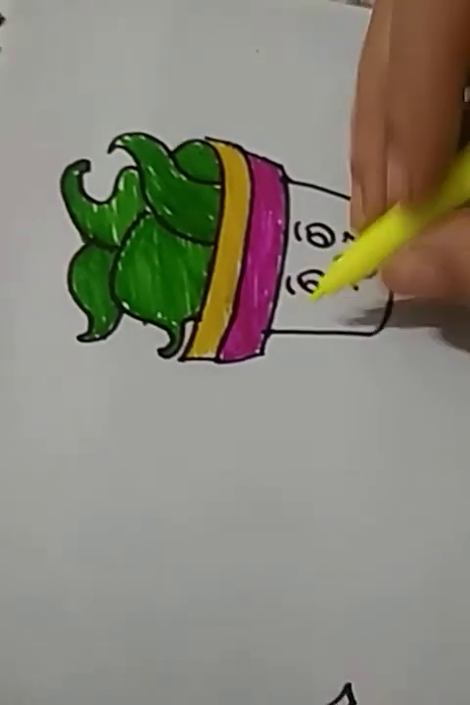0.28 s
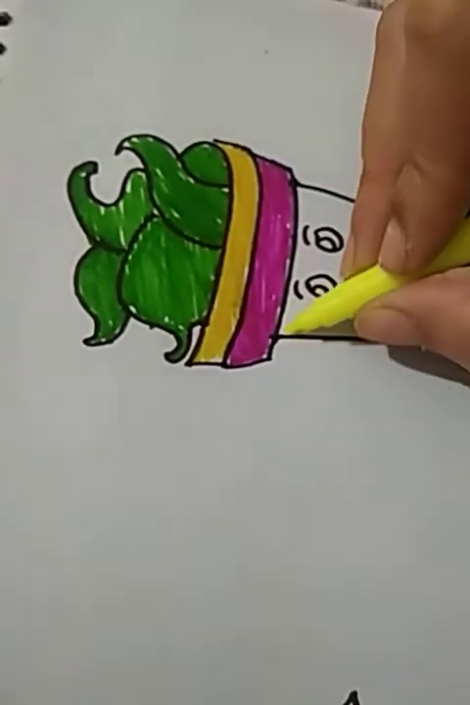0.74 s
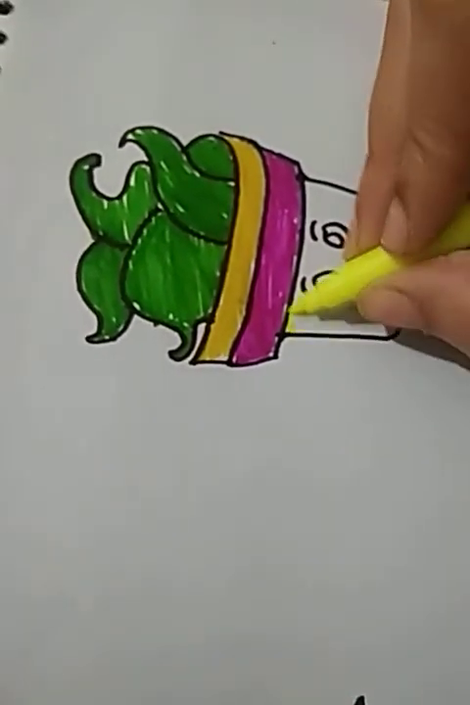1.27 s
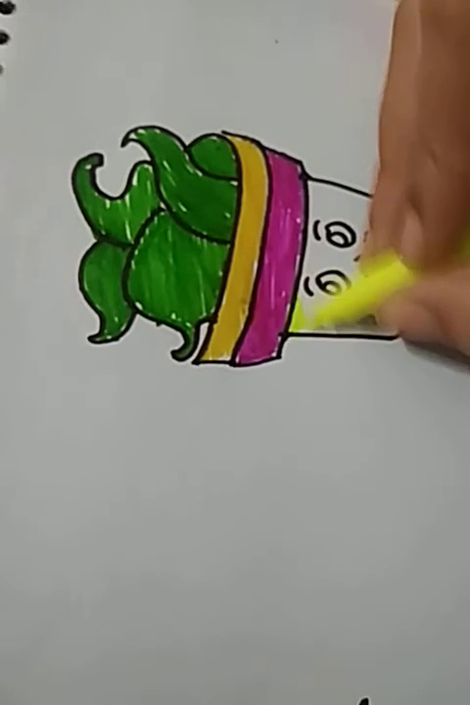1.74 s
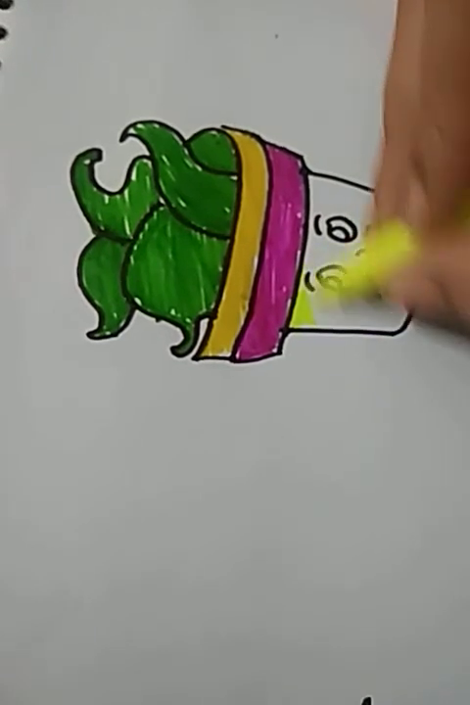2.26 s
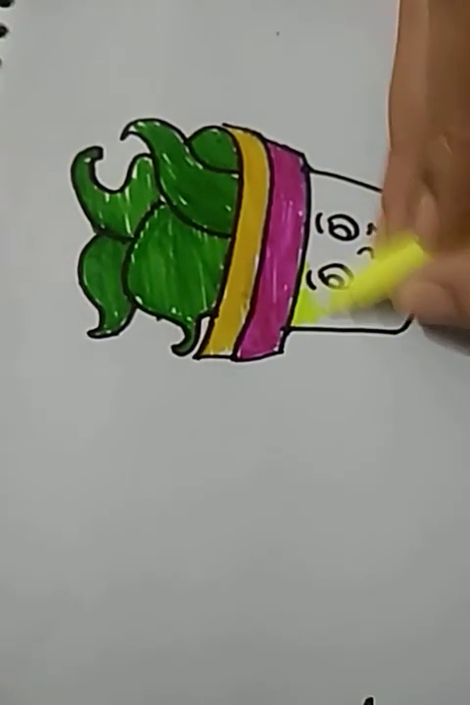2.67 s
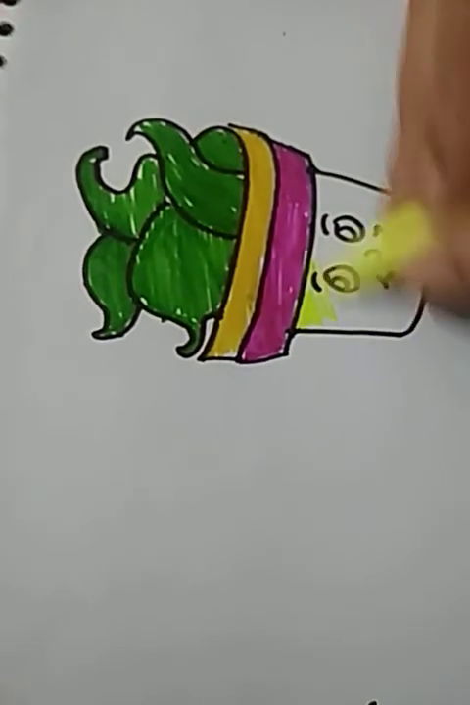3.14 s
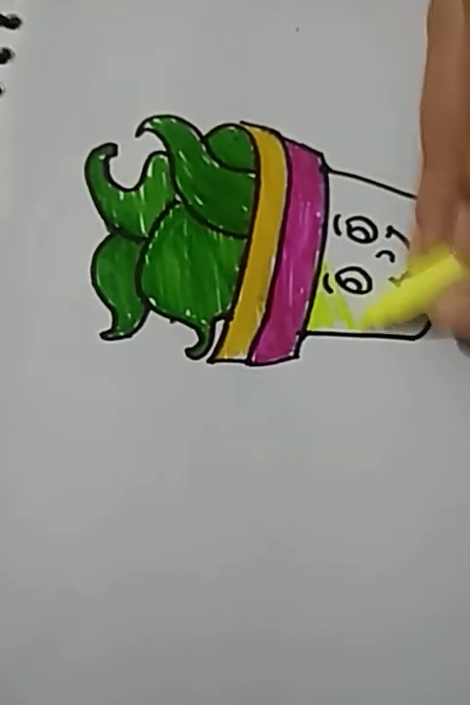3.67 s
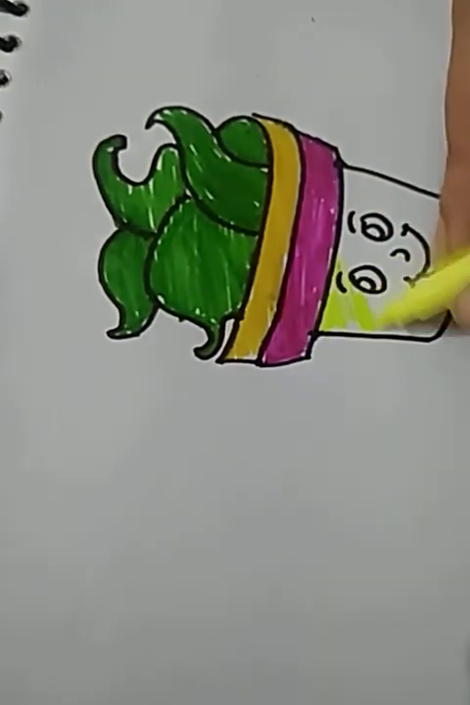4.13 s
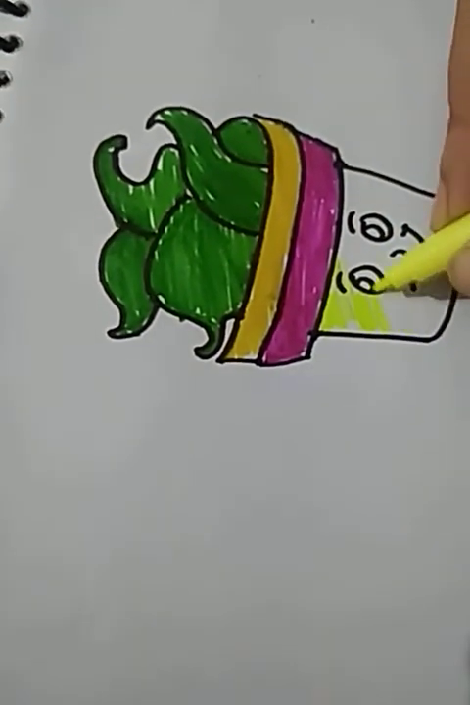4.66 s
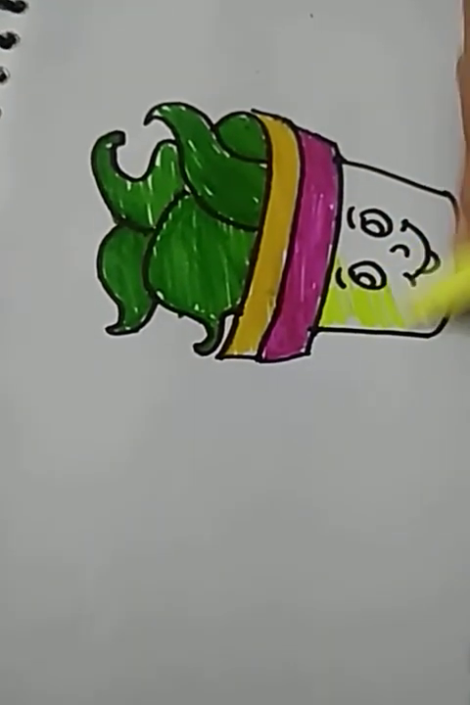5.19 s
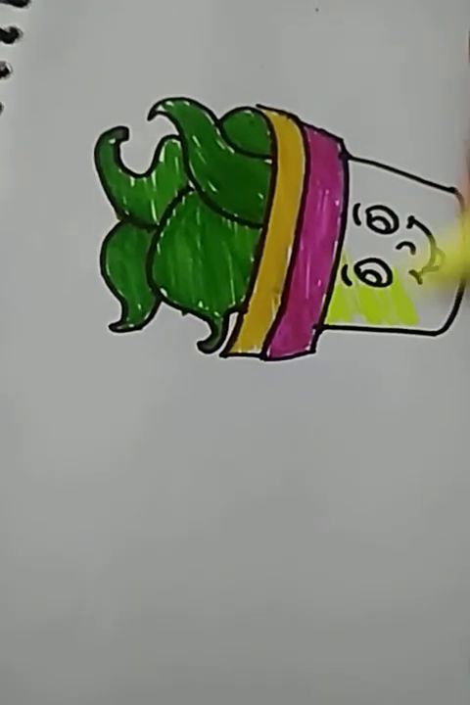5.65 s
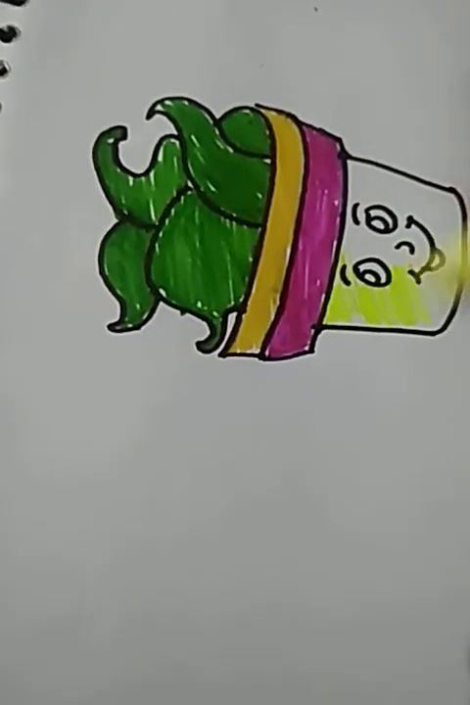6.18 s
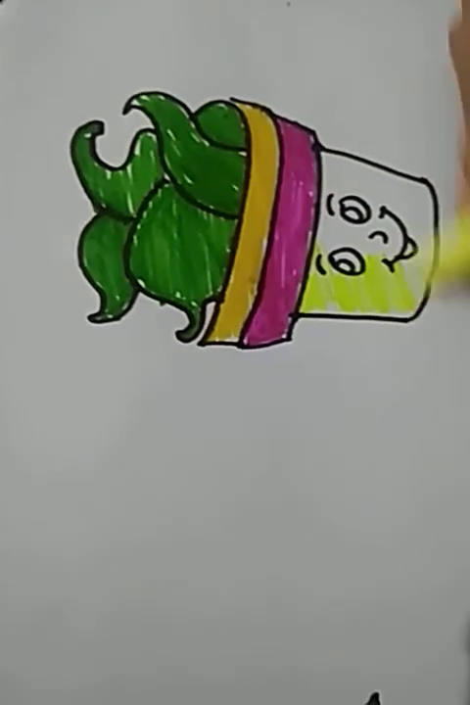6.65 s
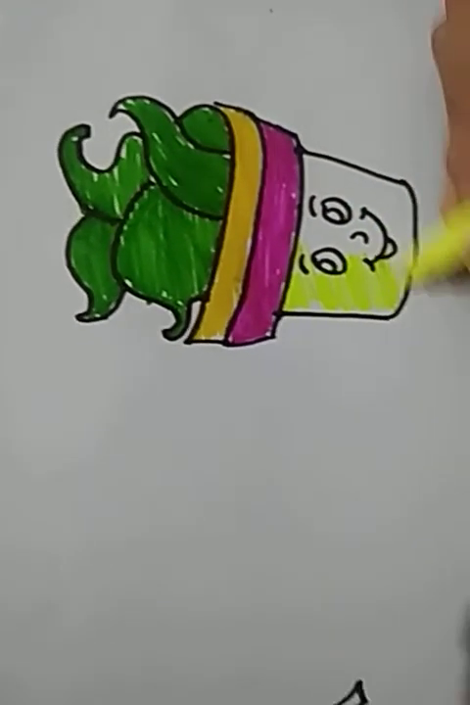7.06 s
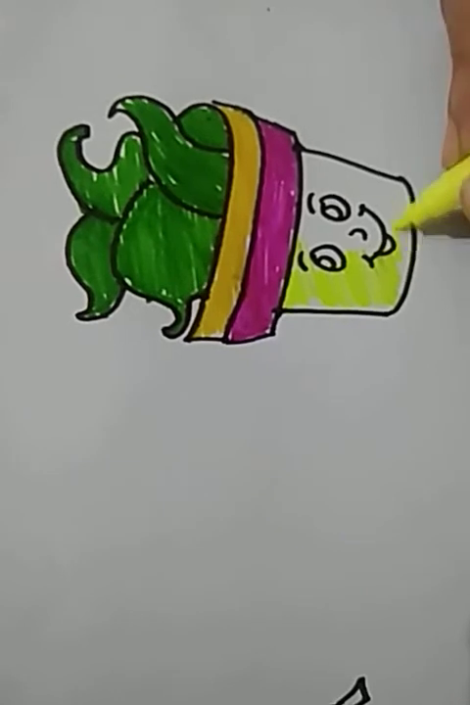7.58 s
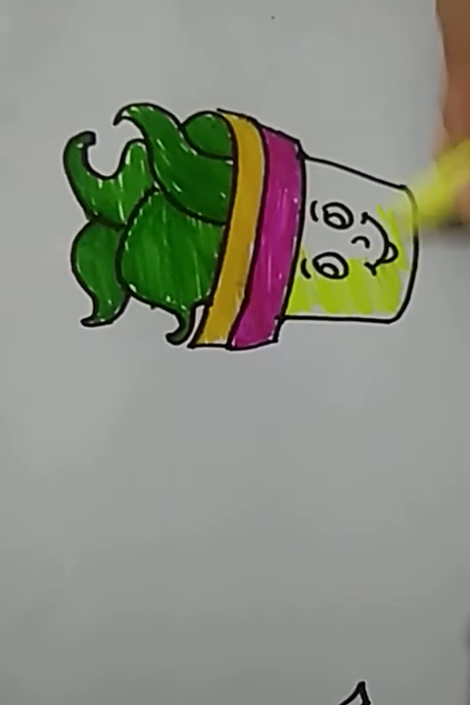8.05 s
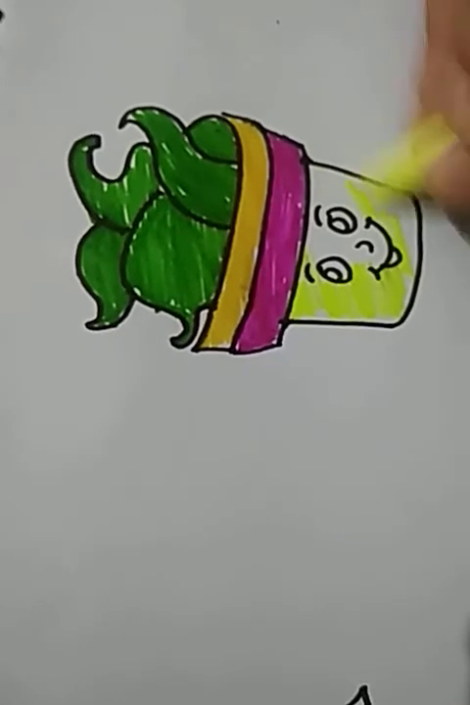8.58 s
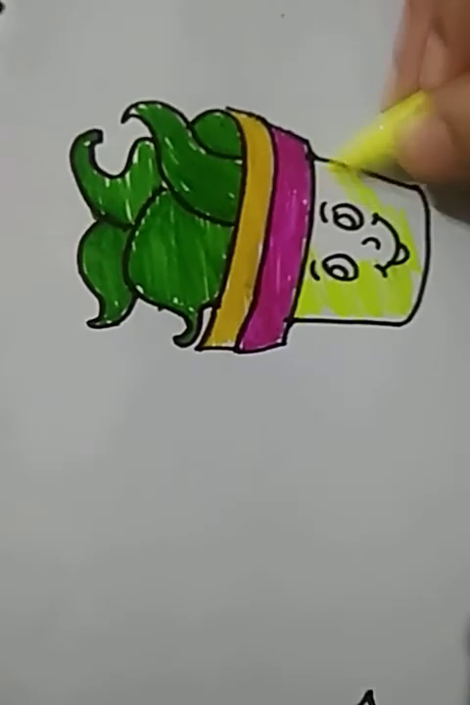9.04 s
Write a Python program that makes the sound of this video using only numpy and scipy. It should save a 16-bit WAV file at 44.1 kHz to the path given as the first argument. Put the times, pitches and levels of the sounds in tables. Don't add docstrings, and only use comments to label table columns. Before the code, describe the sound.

Close squeaky-dry felt pen scratching to and fro on a paper sheet, pausing for slower single strokes, over faint engine drone and low air buffeting.

```python
import sys
import numpy as np
from scipy import signal
from scipy.fft import rfft, irfft
from scipy.io import wavfile
from scipy.ndimage import uniform_filter1d

SR = 44100
rng = np.random.default_rng(int(sys.argv[2]) if len(sys.argv) > 2 else 0)


def makeup_ratio(level_db):
    decades = np.asarray(level_db, float) / 20
    return 10 ** decades


def unload_wav(signal):
    wavfile.write(
        sys.argv[1],
        SR,
        np.round(np.clip(np.atleast_2d(signal).T, -1, 1) * 32767).astype(np.int16),
    )


N = 411012
T = np.arange(N) / SR


def evened(x):
    return x / np.sqrt(np.mean(abs(x) ** 2) + 1e-20)


def read(points, hz):
    f, value = np.transpose(points)
    return np.interp(np.log(hz + 1), np.log(f + 1), value)


def follow(rows, t):
    s, *columns = np.transpose(rows)
    return [np.interp(t, s, c) for c in columns]


def slow(hz):
    lowpass = signal.butter(2, hz, fs=SR / 64, output="sos")
    coarse = evened(signal.sosfilt(lowpass, rng.standard_normal(N // 64 + 2)))
    return np.interp(np.arange(N) / 64, np.arange(len(coarse)), coarse)


def resonate(x, hz, width):
    turn = np.exp(2j * np.pi * np.cumsum(hz * np.ones(len(x))) / SR)
    r = np.exp(-np.pi * width / SR)
    smooth = signal.lfilter([(1 - r) ** 2], [1, -2 * r, r * r], x / turn + 1e-18)
    return 2 * (turn * smooth).real


def dip(hz, centre_hz, width, db):
    return db / (1 + ((hz - centre_hz) / width) ** 2)


def noise_pair(colour, same, patchy_db, patch_s, patch_hz, size):
    hop, hz = size // 4, np.fft.rfftfreq(size, 1 / SR)
    a, b, c, d, patches = rng.standard_normal((N // hop + 5, len(hz), 5)).T
    patches = uniform_filter1d(patches, max(round(patch_hz * size / SR), 1), 0)
    patches = evened(uniform_filter1d(patches, max(round(patch_s * SR / hop), 1), 1))
    same, left = np.clip(same, -1, 1), a + 1j * b
    right = same * left + np.sqrt(1 - same ** 2) * (c + 1j * d)
    z = np.array([left, right]) * makeup_ratio(read(colour, hz)[:, None] + patchy_db * patches)
    return evened(signal.istft(z, nperseg=size, noverlap=size - hop)[1][:, :N])


def engine(gone_s=4.64, beat_db=2.5, pan_db=7.0):
    # t/s, f/Hz, level/dB
    crank = [(0, 25.03, -60), (.25, 26.78, -73), (.84, 27.49, -71), (1.29, 27.7, -55), (1.64, 25.52, -43),
             (1.95, 23.76, -43.5), (2.45, 23.14, -45), (2.88, 21.92, -44.5), (3.2, 21.34, -54),
             (3.75, 23.27, -55), (4.05, 22.56, -61.5), (4.4, 21.67, -60.5)]
    # t/s, half length/s, level/dB
    surges = [(0.502, 0.56, -49.5), (1.091, 0.22, -45), (1.606, 0.22, -60), (2.503, 0.39, -47),
              (3.652, 0.14, -50.5), (4.242, 0.064, -51)]
    # multiple of the crank rate, level under the main pair/dB
    side_orders = [(2, -16.5), (4, -14), (5, -19.5), (6, -16), (7, -19), (8, -26.5), (9, -37.5), (10, -40)]
    boom_hz, boom_width = 86.74, 2
    coast_s, coast_half_s, coast_db = 3.44, 0.64, -56

    hz, db = follow(crank, T)
    main = makeup_ratio(db)
    for s, half, b in surges:
        main += makeup_ratio(b) * np.cos(np.pi / 2 * np.clip((T - s) / half, -1, 1)) ** 2
    third = makeup_ratio(7) / (1 + ((3 * hz - boom_hz) / boom_width) ** 2)
    fourth = 1 / (1 + ((4 * hz - boom_hz) / boom_width) ** 2)
    turns = 2 * np.pi * np.cumsum(hz) / SR
    hum = main * (third * np.sin(3 * turns) + fourth * np.sin(4 * turns)) / np.hypot(third, fourth)
    for order, db in side_orders:
        hum += main * makeup_ratio(db + beat_db * slow(3.3)) * np.sin(order * turns + .7 * slow(4))
    coast = np.cos(np.pi / 2 * np.clip((T - coast_s) / coast_half_s, -1, 1))
    hum += makeup_ratio(coast_db) * coast * np.sin(5 * turns)
    rasp = evened(resonate(rng.standard_normal(N), 7.3 * hz, 78))
    hum += main * makeup_ratio(-21 - 6.7 * (T > 3.3)) * rasp
    fade = np.clip((gone_s - T) / 0.44, 0, 1)
    return fade * np.sqrt(2) * hum * makeup_ratio([[pan_db / 2 - .6], [-pan_db / 2 - .6]])


def whine(between_db=-89.5, pan_db=9.0, gone_s=4.75):
    # t/s, length/s, level/dB, f/Hz
    bursts = [(0, 0.044, -73, 890), (0.061, 0.06, -66, 884), (0.158, 0.062, -69, 885),
              (0.346, 0.075, -77.5, 866), (0.506, 0.049, -79, 897), (0.679, 0.095, -75, 861),
              (0.899, 0.025, -64.5, 900), (1.05, 0.049, -79, 872), (1.272, 0.24, -81, 870),
              (1.543, 0.15, -83, 799), (1.901, 0.24, -73.5, 754), (2.216, 0.46, -74, 696.5),
              (2.719, 0.12, -74.5, 710), (2.881, 0.26, -79, 650), (3.302, 0.23, -78.5, 718),
              (3.719, 0.14, -75, 733), (4.065, 0.045, -70.5, 737), (4.19, 0.3, -77.5, 690)]
    # t/s, level/dB
    octave = [(0, -85), (1.1, -84), (1.8, -88), (2.4, -90.5), (2.9, -101), (3.2, -99.5), (4.3, -100)]

    s, length, db, hz = np.transpose(bursts)
    hz = np.interp(T, s + length / 2, hz)
    gate = sum(makeup_ratio(b) * ((T >= a) & (T < a + n)) for a, n, b in zip(s, length, db))
    level = uniform_filter1d(gate + makeup_ratio(between_db), size=800) * makeup_ratio(2.2 * slow(25))
    octave_level = makeup_ratio(follow(octave, T)[0])
    tone = []
    for air in rng.standard_normal((2, N)):
        sung = np.where(T < 1.2, evened(resonate(air, hz, 45)), evened(resonate(air, hz, 75)))
        tone.append(level * sung + octave_level * evened(resonate(air, 2 * hz, 120)))
    fade = np.clip((gone_s - T) / 1.8, 0, 1) ** 0.88
    return np.array(tone) * makeup_ratio([[pan_db / 2], [-pan_db / 2]]) * fade


def draught(lump_db=2.5, breeze_pan_db=2.5, gust_rise_s=0.024):
    # f/Hz, level/dB
    air_colour = [(12, -17), (20, -8.5), (86, 1), (157, -15), (246, -20), (380, -27.5), (472, -32),
                  (702, -42), (1500, -64), (1950, -102), (3300, -120)]
    # t/s, level/dB
    breeze_curve = [(0, -48), (.44, -47), (1.3, -44.5), (1.61, -45.5), (1.8, -45), (2.6, -46.5),
                    (3.1, -47.5), (3.6, -48), (4.2, -57), (5.1, -56.5), (6.2, -53), (6.5, -52), (7.3, -53),
                    (7.55, -56.5), (8.1, -54), (8.77, -55.5), (9.32, -56)]
    # t/s, peak level/dB, fade/s, left minus right/dB
    gusts = [(1.008, -39.5, 0.12, -13), (3.169, -46, 0.98, -7), (4.928, -48, 0.13, -24),
             (5.237, -41.5, 0.57, -0.5), (5.4, -45, 0.11, -21), (5.663, -38.5, 0.3, -21.5),
             (5.785, -44, 0.19, -30.5), (5.969, -39.5, 0.12, -20), (6.132, -37.5, 0.11, -6),
             (6.285, -48, 0.056, -14), (6.562, -43.5, 0.057, -17), (6.929, -43, 0.047, -17),
             (7.04, -52, 0.049, -11), (7.2, -49, 0.14, -20), (7.289, -47, 0.16, -31),
             (7.702, -45, 0.05, -29.5), (7.796, -43.5, 0.085, -23.5), (8.18, -54, 0.27, -24),
             (8.236, -46, 0.038, -25), (8.279, -50, 0.35, -28), (9.029, -57, 0.056, -18),
             (9.133, -47.5, 0.17, -11)]

    sides = np.array([[.5], [-.5]])
    early = np.clip(4.4 - T, 0, 1)
    breeze = makeup_ratio(follow(breeze_curve, T)[0] - 6.2 * early + (breeze_pan_db + 2.4 * early) * sides)
    power = np.zeros((2, N))
    for s, db, fade_s, pan_db in gusts:
        at = slice(round((s - gust_rise_s) * SR), round((s + 2 * fade_s) * SR))
        t = T[at] - s
        rise = np.clip(1 + t / gust_rise_s, 0, 1)
        power[:, at] += (rise * makeup_ratio(db - 20 * np.maximum(t, 0) / fade_s + pan_db * sides)) ** 2
    lumps_db = (lump_db + 1.2 * (1 - early)) * np.array([slow(38.0), slow(20.3)])
    air = noise_pair(air_colour, same=0.49, patchy_db=2.0, patch_s=0.061, patch_hz=120, size=1024)
    thump_band = signal.butter(2, [42, 213], "bandpass", fs=SR, output="sos")
    dull = signal.sosfilt(thump_band, air[:, ::-1])
    return (air * breeze + dull * np.sqrt(power) * makeup_ratio(-4.5)) * makeup_ratio(lumps_db)


def hiss(room_hz=1350, room_width=600):
    # t/s, level/dB
    hiss_curve = [(0, -72), (.9, -71.5), (1.7, -70.5), (2.3, -78), (3.2, -81.5), (4.5, -81.5), (7.3, -81.5),
                  (7.46, -101), (7.6, -82.5), (9.4, -82.5)]
    # f/Hz, level/dB
    hiss_colour = [(590, -58.5), (1000, -5.5), (1550, -14.5), (1720, -13), (2110, -6.5), (3190, -0.5),
                   (6800, -3.5), (7650, -8), (8500, -0.5), (13200, -9), (13700, -11.5), (14400, -7),
                   (15600, -20)]
    # f/Hz, level/dB
    left_tilt = [(3000, 5.5), (5000, -3), (6300, -9), (8500, 0), (9500, -3), (11500, 4.5), (15000, 1)]
    # t/s, level/dB
    settling = [(0, -59), (.038, -61), (.047, -80), (.064, -69), (.11, -90)]

    thin = noise_pair(hiss_colour, same=.1, patchy_db=1.2, patch_s=.05, patch_hz=300, size=512)
    thin[0] = irfft(rfft(thin[0]) * makeup_ratio(read(left_tilt, np.fft.rfftfreq(N, 1 / SR))), N)
    shared, *own = rng.standard_normal((3, SR // 4))
    room = evened(np.array([resonate(shared + 0.4 * o, room_hz, room_width) for o in own]))
    room = np.pad(room, ((0, 0), (0, N - SR // 4)))
    return thin * makeup_ratio(follow(hiss_curve, T)[0] + [[-1.5], [1.5]]) + room * makeup_ratio(follow(settling, T)[0])


def tick(s=.064, db=-61.0, t60=.012):
    t = np.maximum(T - s, 0)
    burst = rng.standard_normal(N) * (T > s)
    return burst * makeup_ratio(db - 60 * np.minimum(t, .1) / t60) * makeup_ratio([[0], [-10]])


def warbles(length_s=0.059, width=55, lead_s=0.013):
    # t/s, peak level/dB, f/Hz, left minus right/dB
    leftovers = [(0.239, -75, 400, -5), (0.789, -59, 606, -23), (0.909, -58.5, 610, 23),
                 (1.321, -65, 463, 26), (3.697, -61, 458, 16), (4.23, -60, 490.5, 16),
                 (4.315, -60, 623, -14), (4.603, -64, 459, 27), (4.929, -71, 520, 5), (5.651, -67, 457, -3),
                 (6.88, -66, 494, 18), (7.16, -64, 616, -17), (7.818, -70, 490, 20),
                 (8.245, -58.5, 520, -13), (8.34, -53.5, 510, 8), (9.14, -63.5, 484, -12)]
    # t/s, peak level/dB, f/Hz, left minus right/dB
    bumps = [(3.004, -46, 210, 15), (3.082, -48.5, 246.7, 6), (6.535, -54, 240, 13), (6.991, -56.5, 255, 9),
             (7.047, -58.5, 253, 8), (7.264, -42, 202, -26), (7.302, -44, 226, -2), (8.08, -53.5, 248, 44)]
    # t/s, peak level/dB, f/Hz, left minus right/dB
    chirps = [(2.201, -75.5, 1106, 17), (3.13, -78, 1360, 8), (4.949, -76, 1032, 15), (4.955, -74, 630, -2),
              (.905, -67, 900, 10), (1.62, -73.5, 1115, 6), (6.46, -75, 830, 8.5), (7.17, -85, 858, 5),
              (7.879, -68.5, 485, 14), (7.98, -78, 1067, 13), (8.687, -78, 995, 10), (9.25, -71.5, 630, 20)]

    patches = [*leftovers, *bumps, *chirps]
    out, n = np.zeros((2, N)), round(length_s * SR)
    for s, db, hz, pan_db in patches:
        ringing = resonate(rng.standard_normal(8000), hz, width)[-n:]
        patch = evened(ringing) * np.hanning(n) * makeup_ratio(db - 9.5)
        pan = makeup_ratio([[min(pan_db, 0) + 7.5], [min(-pan_db, 0) + 3.5]])
        out[:, round((s - lead_s) * SR):][:, :n] += patch * pan
    return out


def strokes():
    # t/s, length/s, level/dB, fastest point 0-1
    opening = [(0.987, 0.079, -55.5, 0.3), (1.06, 0.11, -56, 0.5), (1.167, 0.087, -50.5, 0.67),
               (1.263, 0.085, -57, 0.76), (1.384, 0.072, -52, 0.72), (1.477, 0.087, -58, 0.5)]
    # t/s, length/s, level/dB, fastest point 0-1
    corner = [(1.577, 0.089, -54, 0.61), (1.684, 0.092, -58.5, 0.63), (1.804, 0.1, -52.5, 0.73),
              (1.92, 0.13, -55.5, 0.7)]
    # t/s, length/s, level/dB, fastest point 0-1
    filling = [(3.516, 0.089, -60, 0.59), (3.611, 0.097, -61.5, 0.71), (3.721, 0.089, -56.5, 0.5),
               (3.817, 0.12, -58.5, 0.58), (3.936, 0.086, -57, 0.56), (4.043, 0.097, -61.5, 0.55),
               (4.144, 0.092, -55, 0.65), (4.246, 0.1, -57, 0.63), (4.354, 0.087, -55.5, 0.44),
               (4.45, 0.12, -59, 0.64), (4.571, 0.087, -53, 0.6), (4.667, 0.1, -56, 0.62),
               (4.779, 0.08, -53.5, 0.55), (4.88, 0.103, -55, 0.61), (4.987, 0.09, -53, 0.53),
               (5.092, 0.102, -55.5, 0.59), (5.198, 0.087, -52, 0.46), (5.29, 0.11, -54, 0.62),
               (5.402, 0.1, -50.5, 0.53), (5.506, 0.1, -50, 0.61)]
    # t/s, length/s, level/dB, fastest point 0-1
    widening = [(5.614, 0.096, -49.5, 0.56), (5.72, 0.102, -50.5, 0.58), (5.825, 0.095, -51.5, 0.46),
                (5.923, 0.1, -52, 0.5), (6.031, 0.089, -50.5, 0.49), (6.127, 0.098, -50.5, 0.57),
                (6.235, 0.08, -51, 0.43), (6.338, 0.09, -52.5, 0.51), (6.433, 0.088, -52.9, 0.47),
                (6.544, 0.084, -51.5, 0.5), (6.636, 0.091, -53.5, 0.54), (6.746, 0.088, -54, 0.59),
                (6.84, 0.095, -52.5, 0.41), (6.946, 0.097, -55, 0.54), (7.052, 0.081, -56.5, 0.57),
                (7.159, 0.076, -56.5, 0.56), (7.252, 0.065, -57, 0.52)]
    # t/s, length/s, level/dB, fastest point 0-1
    rim = [(7.47, 0.096, -55.5, 0.59), (7.572, 0.104, -52.5, 0.65), (7.691, 0.12, -48, 0.47),
           (7.818, 0.093, -52.5, 0.52), (7.906, 0.12, -50, 0.51), (8.043, 0.082, -54.5, 0.46),
           (8.136, 0.11, -47.5, 0.42), (8.269, 0.064, -53, 0.5), (8.347, 0.099, -51, 0.48),
           (8.468, 0.079, -52.5, 0.54), (8.56, 0.099, -49.5, 0.41), (8.678, 0.083, -53.4, 0.38),
           (8.766, 0.1, -52, 0.46), (8.876, 0.095, -53, 0.6), (8.98, 0.097, -52.5, 0.3),
           (9.079, 0.08, -56.5, 0.63), (9.183, 0.073, -55, 0.39), (9.264, 0.089, -56.5, 0.68)]
    # t/s, length/s, level/dB, fastest point 0-1
    hover = [(7.334, .11, -74.5, .5), (7.45, .022, -88, .5)]
    # level at the turn/dB, sheet body/dB
    phrases = [(opening, (-61.5, 3.2), (-59, 3.5)), (corner, (-69.5, 2.3), (-66, -0.58)),
               (filling, (-75, 6.6), (-73, 0.93)), (widening, (-72, 5.8), (-71.5, 0.91)),
               (hover, (-68.5, 0.49), (-81.5, 1.4)), (rim, (-71.5, 3.3), (-71, 1.7))]
    # t/s, push length/s, push level/dB, trail level/dB
    lifted = [(2.02, 0.13, -52.5, -69.5), (2.322, 0.11, -53.5, -69), (2.645, 0.12, -50.5, -72.5),
              (2.962, 0.12, -52, -72.5), (3.272, 0.093, -55, -72)]
    # t/s, length/s, level/dB
    grazes = [(2.274, 0.024, -69), (2.541, 0.036, -64), (2.874, 0.046, -62.5), (3.18, 0.035, -89.5),
              (3.455, 0.052, -60)]
    push, trail = (0.63, -73.5, 5.5), (.12, -62, 11)
    graze, aloft = (.36, -90, -5.5), (.38, -68.5, 0)
    aloft_db, end_s = -85, 9.335

    rows = [(end_s, 1, aloft_db, .5, *push[1:])]
    for phrase, *manners in phrases:
        rows += [(*row, *manners[k % 2]) for k, row in enumerate(phrase)]
    for s, length, push_db, trail_db in lifted:
        rows += [(s, 1, push_db, *push), (s + length, 1, trail_db, *trail)]
    for s, length, db in grazes:
        rows += [(s, 1, db, *graze), (s + length, 1, aloft_db, *aloft)]
    return sorted(rows)


def stroke_curves(edge=1.24, flatness=2.17):
    turn, length, top_db, fastest, turn_db, body_db = np.transpose(strokes())
    k = np.clip(np.searchsorted(turn, T) - 1, 0, len(turn) - 2)
    u = np.clip((T - turn[k]) / np.minimum(turn[k + 1] - turn[k], length[k]), 0, 1 - 1e-9)
    u = u ** (np.log(.5) / np.log(np.clip(fastest[k], .15, .85)))
    speed = np.tanh(flatness * np.sin(np.pi * u) ** edge) / np.tanh(flatness)
    rest_db = turn_db[k] + u * (turn_db[k + 1] - turn_db[k])
    touch_down = np.clip((T - turn[0]) / 0.016, 0, 1)
    level = makeup_ratio(rest_db + speed * (top_db[k] - rest_db)) * touch_down
    place = (-1.) ** k * np.cos(np.pi * u)
    return level, uniform_filter1d(body_db[k], size=900), place


def nib(grain_db=1.0, drag_db=0.32, gain_db=2.0, swing=.016):
    # t/s, left minus right/dB, port resonance/dB, left lag/ms
    hand = [(.9, 3, -20, .28), (1.6, 4.5, -9, 0.245), (3, 4.5, -3, 0.2215), (4.5, 4, -3, 0.224),
            (5.6, 1, -2.5, 0.229), (6.8, 3, -4, 0.234), (8.2, 2, -4.5, 0.2486), (9.4, -6, -5.5, 0.26)]
    # t/s, broad left loss/dB, right notch f/Hz, loss under the shoulder/dB
    shade = [(1, -0.5, 2900, 9.5), (2.5, -6.5, 2850, 2.5), (4, -8, 3060, -6.5), (6, -2, 3030, -10),
             (7.4, -5.5, 3100, -1.5), (8.2, 5, 3070, -9), (9.4, 0, 3120, -16)]
    # t/s, lower at the left port f/Hz, upper at both f/Hz
    desk_dips = [(1, 3540, 7200), (3.4, 3534, 7220), (5, 3520, 6140), (7, 3620, 5850), (7.6, 3770, 5070),
                 (9.4, 3440, 5680)]
    # f/Hz, level/dB
    left_port = [(1200, -29.5), (1800, -34), (2400, -18), (2900, -16.5), (3600, -12), (4500, -18),
                 (5300, -13.5), (6100, -6.5), (7200, -12.5), (7900, -13), (10200, 0), (12100, 4.5),
                 (13200, -2), (14200, -7.5), (15200, -7), (15700, -17)]
    # f/Hz, level/dB
    right_port = [(1200, -34), (1800, -36), (2700, -33.5), (3600, -25), (4500, -21), (5200, -16),
                  (6100, -13.5), (7200, -14), (8500, -10.5), (10000, -7.5), (11300, -6.5), (12300, -0.5),
                  (13800, -8.5), (15200, -11), (15700, -19)]
    # f/Hz, width/Hz, level/dB
    left_dips = [(5560, 110, -8), (6300, 250, -10)]
    # f/Hz, width/Hz, level/dB
    right_dips = [(2350, 90, -14), (5560, 130, -7), (6250, 300, -7)]
    # delay/ms, level/dB
    left_echoes = [(.4, -29.5), (1.051, -10.5), (1.2, -27.5), (1.579, -18), (2.2, -29)]
    # delay/ms, level/dB
    right_echoes = [(.66, -20.5), (.95, -14.5), (1.42, -16.5), (1.901, -18), (2.299, -21.5)]
    # f/Hz, share 0-1
    scatter = [(5000, .4), (8500, .55), (10500, .68), (12300, .35), (13500, .68)]

    level, body_db, place = stroke_curves()
    grain = evened(uniform_filter1d(rng.standard_normal(N), size=9))
    snags = rng.standard_normal((3, N)) * makeup_ratio(grain_db * grain + drag_db * slow(90))
    hz, t, z = signal.stft(level * evened(snags), SR, nperseg=512, noverlap=256)
    own = read(scatter, hz)[:, None]
    z = np.sqrt(1 - own ** 2) * z[0] + own * z[1:]
    pan_db, treble_db, lag_ms = follow(hand, t)
    lower_hz, upper_hz = follow(desk_dips, t)
    shade_db, notch_hz, shoulder_db = follow(shade, t)
    stretch = 1 + swing * np.interp(t, T, place) + 1.1 * (lag_ms - .23)
    hz = hz[:, None]
    low = 1 / (1 + (hz / 7000) ** 5)
    z *= makeup_ratio(low * np.interp(t, T, body_db) + dip(hz, 12480, 2600, treble_db) + dip(hz, upper_hz, 340, -2.2))
    z *= makeup_ratio(shoulder_db / (1 + (hz / 2250) ** 8))
    ports = [(left_port, left_dips, left_echoes), (right_port, right_dips, right_echoes)]
    for c, (colour, dips, echoes) in enumerate(ports):
        paths = 1 + sum(makeup_ratio(db) * np.exp(-2j * np.pi * hz * ms * stretch / 1000) for ms, db in echoes)
        tone = makeup_ratio(read([(600, -64.0), *colour], hz) + sum(dip(hz, *row) for row in dips))
        z[c] *= paths * tone / np.sqrt(np.mean(tone ** 2))
    z[0] *= makeup_ratio(pan_db / 2 + dip(hz, lower_hz, 130, -14.0) + dip(hz, 5120, 520, shade_db))
    z[0] *= np.exp(-2j * np.pi * hz * lag_ms / 1000)
    z[1] *= makeup_ratio(-pan_db / 2 + dip(hz, notch_hz, 80, -27.0))
    return makeup_ratio(gain_db) * signal.istft(z, SR, nperseg=512, noverlap=256)[1][:, :N]


def scene():
    # t/s, length/s, level/dB
    gaps = [(0.152, 0.063, -5), (4.791, 0.067, -18), (7.569, 0.051, -38), (8.126, 0.024, -37),
            (8.559, 0.021, -16), (8.742, 0.014, -30), (8.817, 0.064, -29), (8.843, 0.053, -46),
            (8.886, 0.056, -29), (8.951, 0.056, -18.5), (9.068, 0.044, -25)]

    shut_db = sum(db * ((T > s) & (T < s + length)) for s, length, db in gaps)
    shut_db = uniform_filter1d(shut_db, size=500)
    bass = engine() + whine() + draught() + warbles()
    deep = signal.sosfiltfilt(signal.butter(2, 260, fs=SR, output="sos"), bass)
    bass = deep * makeup_ratio(shut_db) + (bass - deep) * makeup_ratio(0.48 * shut_db)
    thin = hiss()
    low = signal.sosfiltfilt(signal.butter(3, 2100, fs=SR, output="sos"), thin)
    thin = thin - low * (1 - makeup_ratio(0.45 * shut_db))
    return nib() + bass + thin + tick()


def low_pass(x):
    return signal.sosfilt(signal.butter(12, 15710, fs=SR, output="sos"), x)


def record(dry):
    return low_pass(dry)


dry = scene()
out = record(dry)
unload_wav(out)
```